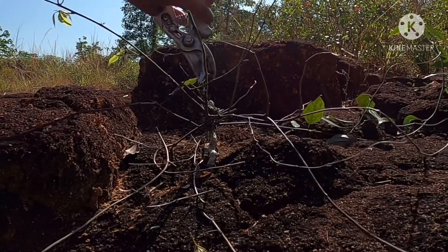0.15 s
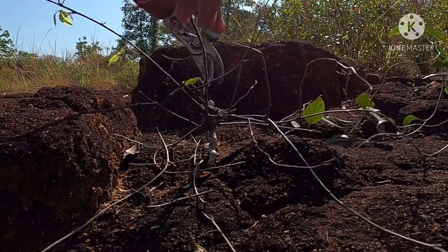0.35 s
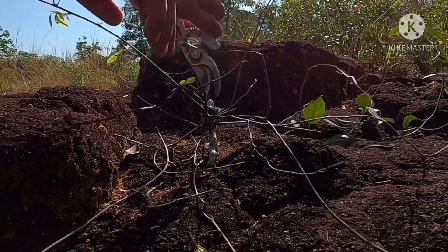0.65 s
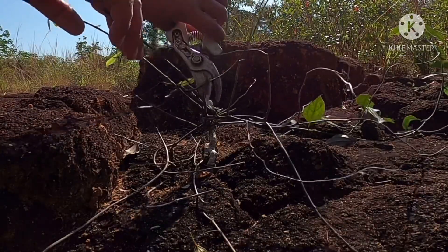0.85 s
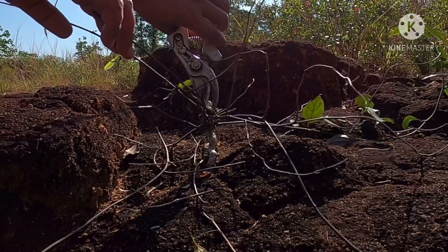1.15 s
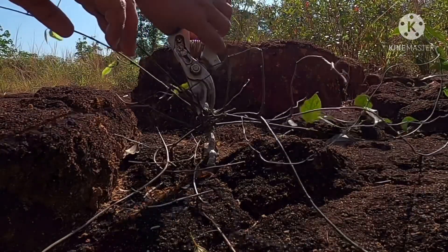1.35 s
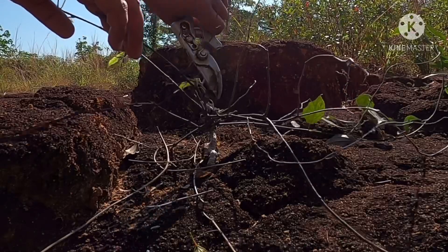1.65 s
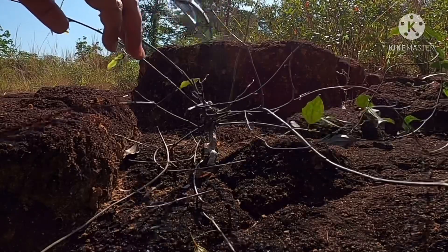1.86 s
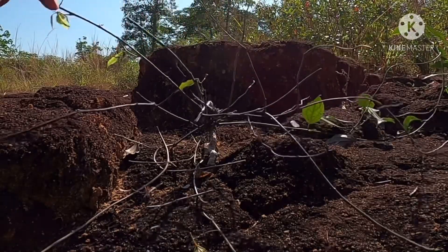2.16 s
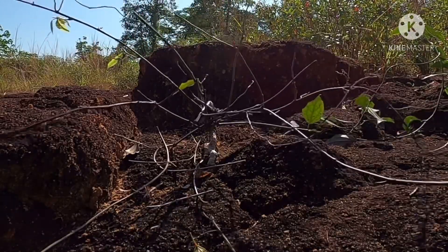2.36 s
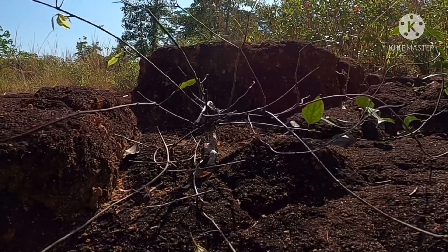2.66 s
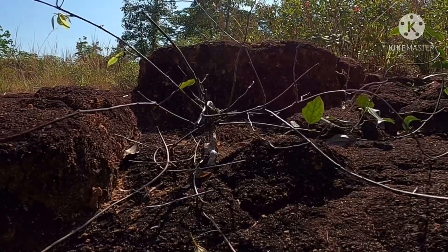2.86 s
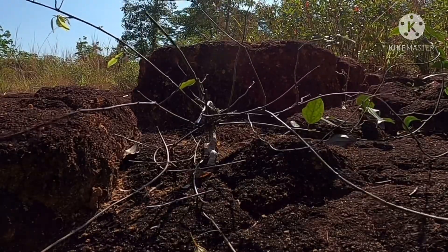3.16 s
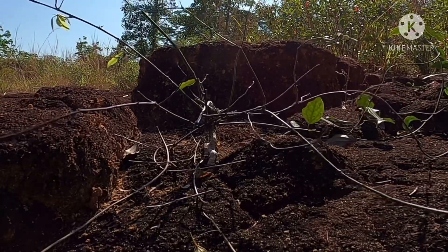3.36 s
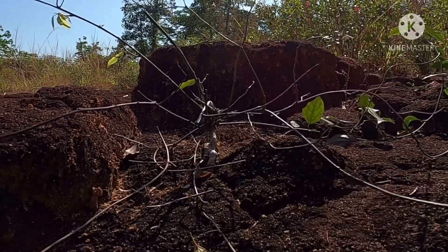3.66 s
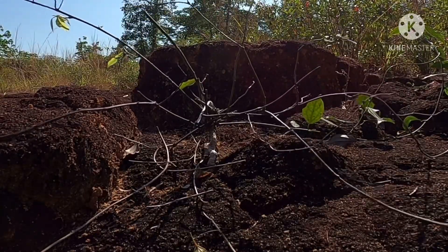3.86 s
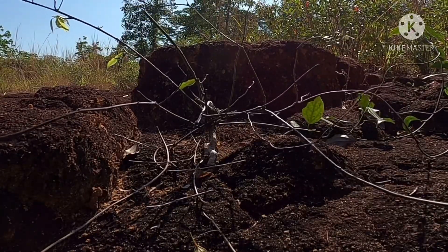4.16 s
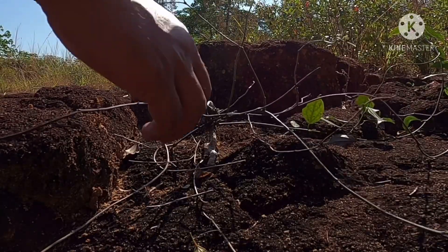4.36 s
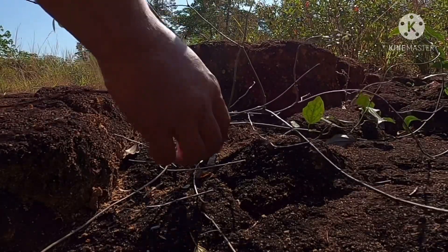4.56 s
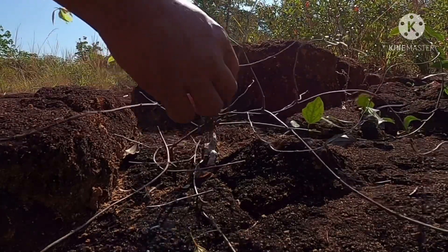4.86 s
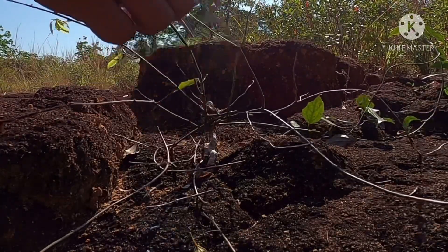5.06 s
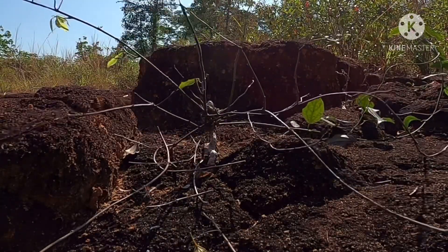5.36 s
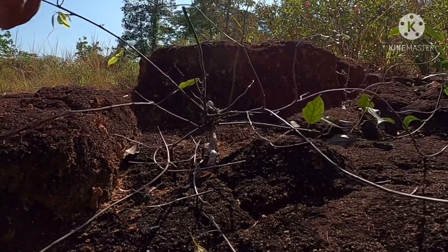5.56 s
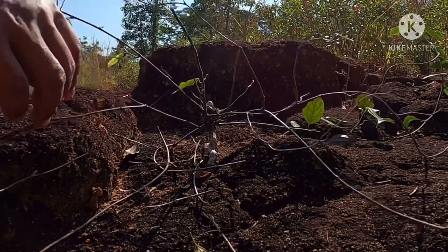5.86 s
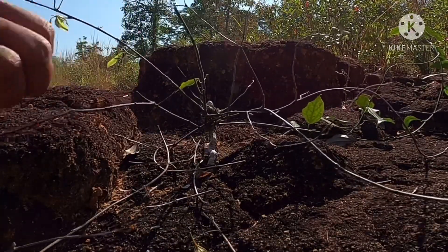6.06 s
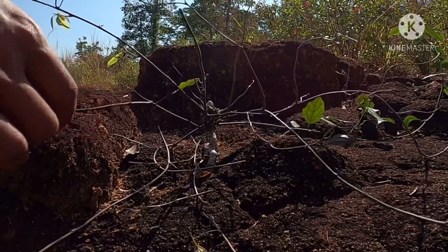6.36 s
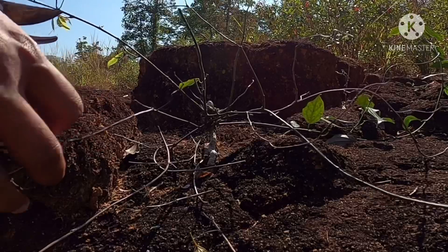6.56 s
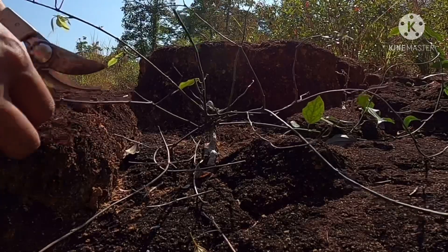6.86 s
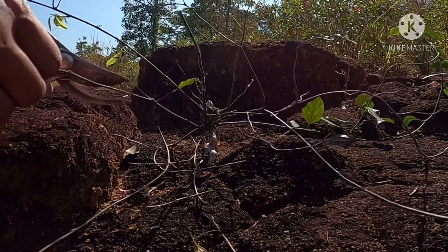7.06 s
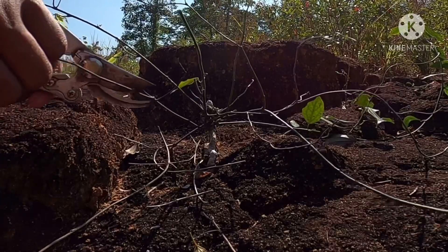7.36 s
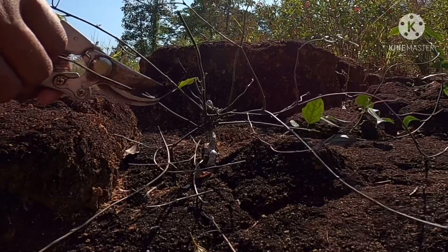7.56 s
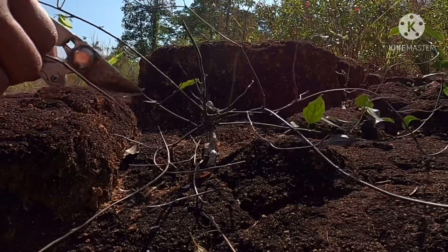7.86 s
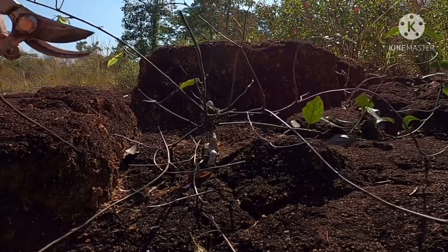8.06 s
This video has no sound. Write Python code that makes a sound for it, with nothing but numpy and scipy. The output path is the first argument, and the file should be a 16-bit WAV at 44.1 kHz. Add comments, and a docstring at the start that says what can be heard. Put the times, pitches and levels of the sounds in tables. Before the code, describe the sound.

A phone-like microphone sits close to dry twigs on stony open ground. Small ticks lead to a few thin metallic snips, then near quiet with birds whistling softly in scrub. Twigs crackle, scrape and snap as hands pull at them, a stony knock rings briefly, and finally the shears cut with a very loud, bright click. A distant single-cylinder engine murmurs low, and wind briefly bumps the microphone early on.

```python
"""Pruning dry twigs on stony ground

Shears cut thin dry twigs close to a phone: noise puffs ring steel and wood; hands drag twigs that tick and rustle.
Birds are gliding sines in the echo of the scrub: a falling whistle, a thin high trill, short chips and a peep.
A far single-cylinder engine throbs as puffs through a pipe, air hums as shaped noise, and a short gust
buffets the microphone ports with lumpy bass noise."""
import sys
import numpy as np
from scipy import signal
from scipy.fft import rfft, irfft, next_fast_len
from scipy.io import wavfile
from scipy.ndimage import uniform_filter1d, map_coordinates

SR = 44100
rng = np.random.default_rng(int(sys.argv[2]) if len(sys.argv) > 2 else 0)


def to_wav(sig):
    """Store sig (one row per channel, or 1-D mono) as 16-bit WAV at the path in sys.argv[1].

    Samples outside -1..1 are clipped; the rate is SR.
    """
    pcm = np.clip(np.atleast_2d(sig), -1, 1) * 32767
    pcm = np.round(pcm).astype(np.int16)
    wavfile.write(sys.argv[1], SR, pcm.T)  # frames by channels


N = 362502  # samples


def amp(db):
    """Gain of a level in dB."""
    return 10 ** (np.asarray(db) / 20)


def unit(x):
    """Scaled to rms 1."""
    return x / np.sqrt(np.mean(x ** 2) + 1e-20)


def peak(x):
    """Scaled to peak 1."""
    return x / np.abs(x).max()


def along(points, hz):
    """Reads a curve of (Hz, value) points on a log frequency axis."""
    f, v = np.transpose(points)
    return np.interp(np.log(hz + 1), np.log(f + 1), v)


def curves(rows):
    """One value per sample for each column after the time."""
    s, *cols = np.transpose(rows)
    return [np.interp(np.arange(N) / SR, s, c) for c in cols]


def wobble(rate):
    """A smooth random curve, rate knots a second."""
    knots = rng.standard_normal(int(N * rate / SR) + 4)
    return map_coordinates(knots, [np.arange(N) * rate / SR])


def filtered(x, response):
    """x through a complex response of frequency."""
    n = x.shape[-1]
    m = next_fast_len(n + 4096)
    return irfft(rfft(x, m) * response(np.fft.rfftfreq(m, 1 / SR)), m)[..., :n]


def modes(table, notched=False):
    """Causal response of (Hz, width Hz, dB) resonances; notched leaves dips between them."""
    def response(f):
        total = 0
        for k, (centre, width, db) in enumerate(table):
            sign = 1 if notched else (-1) ** k
            damping = 1j * f * width
            total = total + sign * amp(db) * damping / (centre * centre - f * f + damping)
        return total
    return response


def pair(alike):
    """Two white noises of a given left-right likeness."""
    a, b = rng.standard_normal((2, N))
    u = np.arccos(np.clip(alike, 0, 1)) / 2
    return np.array([np.cos(u) * a + np.sin(u) * b, np.cos(u) * a - np.sin(u) * b])


def add(out, s, sound, pan_db=0):
    """Mixes a sound in at s seconds; pan_db is left over right."""
    i = round(s * SR)
    sound = np.atleast_2d(sound)[:, max(-i, 0):N - i]
    first = max(i, 0)
    out[:, first:first + sound.shape[1]] += sound * amp([[pan_db / 2], [-pan_db / 2]])


def burst(t60, lead_s, alike, snap=6):
    """A stereo puff of noise that swells for lead_s, cracks and dies; returns it and its lead-in in seconds."""
    t = np.arange(-1024, 3072) / SR
    a, b = rng.standard_normal((2, len(t)))
    noise = np.array([a, alike * a + np.sqrt(1 - alike ** 2) * b])
    noise[0, 1025] = noise[1, 1024] = snap  # the break itself, reaching the right port first
    shape = np.where(t < 0, np.exp(t / lead_s), amp(-60 * t / t60))
    return noise * shape, -t[0]


def shears():
    """Blades scrape through the wood, then strike; the steel rings briefly and the handles thump."""
    # Each row: contact in seconds, peak in dB before pan, growth time of the scrape in seconds, t60 in seconds,
    # wood pitch in Hz, its level in dB, second pitch in Hz, its level in dB, left over right in dB,
    # treble in dB (none below 4 kHz, in full from 12 kHz)
    snips = [(1.628, -36, 0.00026, 0.04, 4460, 6, 2880, 4, -11, -15),
             (1.6385, -34, .0005, .008, 4100, 6, 1300, 6, -6, -10),
             (1.645, -19, 0.002, 0.0035, 3480, 11, 1430, 3, 4, -10),
             (1.8165, -29.5, 0.0056, 0.0033, 2800, 12, 7030, -2, -2, -4),
             (7.8361, -15.5, .00015, 0.007, 4080, 3, 8830, 9, 3.5, 2),
             (7.8614, -17, .0003, .004, 2600, 8, 2330, 0, 5, -14),
             (7.863, -29, .003, 0.022, 2500, 4, 1850, 6, 6, -14),
             (7.8637, -5, 0.0001, .003, 5500, 4, 7450, 2, -1, 6),
             (8.0035, -29.5, 0.00041, 0.01, 2750, 9, 4330, -22, 6.5, -15)]
    # Resonances of the blades. Each row: centre in Hz, width in Hz, level in dB
    steel = [(2080, 130, -4), (2610, 140, 1), (2950, 150, -4), (3460, 220, -2), (4080, 200, -3),
             (4450, 160, -2), (5540, 400, -1), (6985, 150, 1), (7560, 350, -5), (8800, 250, -11),
             (10400, 1100, -5), (13000, 500, -16)]
    # The handles close: time in seconds, level in dB, pitch in Hz, t60 in seconds
    thump = (7.8685, -32, 185, .07)
    out = np.zeros((2, N))
    for s, db, lead_s, t60, hz, wood_db, second_hz, second_db, pan_db, treble_db in snips:
        puff, early = burst(t60, lead_s, alike=1.0)
        ring = filtered(puff, modes(steel, notched=True))
        # the cut wood sounds at its own pitches
        wood = [(hz, .11 * hz, wood_db), (second_hz, .05 * second_hz, second_db)]
        crack = filtered(puff, modes(wood, notched=True))

        def small_parts(f):  # they radiate no bass
            no_bass = (1j * f / (1100 + 1j * f)) ** 3
            return no_bass * amp(treble_db * np.clip(f / 8000 - .5, 0, 1))
        thin = filtered(ring + crack, small_parts)
        add(out, s - early, amp(db) * peak(thin), pan_db)
    s, db, hz, t60 = thump
    t = np.arange(SR // 8) / SR
    add(out, s, amp(db - 60 * t / t60) * np.sin(2 * np.pi * hz * t))
    return out


def spring():
    """The loose spring of the shears buzzes for a moment around a cut: noise in its resonances."""
    # Each row: start in seconds, end in seconds, rms level in dB
    rattles = [(1.806, 1.843, -65), (7.88, 7.93, -62), (7.995, 8.02, -53)]
    # Resonances of the spring. Each row: centre in Hz, width in Hz, level in dB
    coil = [(2965, 56, 6.5), (2000, 250, -5)]
    out = np.zeros((2, N))
    for start, end, db in rattles:
        noise = rng.standard_normal(round((end - start) * SR))
        buzz = filtered(noise * signal.windows.tukey(len(noise), .6), modes(coil))
        add(out, start, amp(db) * unit(buzz))
    return out


def twigs():
    """Each snap or tick is a short puff around its own pitch, over the twig's body, with more or less treble."""
    # Each row: time in seconds, level in dB, centre in Hz, treble in dB, t60 in seconds
    ticks = [(.055, -57, 2000, -30, 0.013), (0.144, -45.5, 3270, -11.5, 0.028),
             (0.188, -52, 2340, -10, 0.022), (0.234, -45, 3040, -9, 0.013),
             (0.501, -52.5, 2300, -30, 0.018), (0.63, -62.5, 6840, -35, .03),
             (.799, -55.5, 4100, -27, 0.022), (.824, -51, 5400, -20, 0.031),
             (0.854, -47.5, 4570, -23, 0.034), (0.9657, -49, 4530, -28, 0.025),
             (1.7255, -56, 3980, 2, .012), (1.7447, -42, 4700, -2, .005), (1.7637, -50, 5600, -14, 0.031),
             (1.796, -38, 5600, -12, 0.0091), (1.94, -46, 4060, -5, 0.032),
             (2.232, -39.5, 2600, -55, 0.022), (3.4447, -44, 1400, -40, 0.016),
             (3.852, -48, 1500, -40, .015), (4.006, -32.5, 1370, -55, 0.031),
             (4.196, -36.5, 2670, -24, 0.013), (4.555, -49.5, 1560, -26, 0.016),
             (4.568, -58, 5760, -16, .015), (4.595, -53, 4020, -15, 0.015), (4.654, -46, 2300, -12, 0.038),
             (4.688, -55, 2950, -17, .02), (4.739, -50.5, 2430, -4.5, 0.014),
             (4.792, -47, 3230, -14, 0.017), (4.8043, -59, 5000, 1, .012), (4.817, -54, 6000, -8, 0.011),
             (4.876, -46.5, 2980, -9, .025), (4.9472, -31.5, 3240, -2, 0.016),
             (5.016, -36.5, 3900, -14.5, 0.017), (5.049, -52, 2500, -4, 0.0088),
             (5.111, -50, 2320, -20, 0.017), (5.147, -46, 2500, -21, 0.014), (5.203, -60, 4030, -8, .012),
             (5.4071, -28, 3440, -12.5, 0.016), (5.448, -49, 3530, -9, 0.017), (5.462, -55, 8100, -5, .012),
             (5.4849, -51, 5330, -13, .02), (5.588, -45, 5900, -16, .012), (5.5965, -37.5, 3550, -8, 0.016),
             (5.662, -58, 7000, -10, .012), (5.81, -39.5, 3770, -30, 0.014), (5.824, -51, 6500, -22, 0.015),
             (5.941, -44.5, 5600, -18, 0.016), (6.007, -47, 5000, -13, .015),
             (6.017, -43.5, 3900, -20, 0.018), (6.03, -51, 6500, -15, 0.018),
             (6.076, -29, 2220, -21.5, 0.02), (6.1062, -31.5, 2160, -21, 0.033),
             (6.1125, -32, 2860, -27, 0.031), (6.156, -46, 3960, -16, 0.016),
             (6.2145, -42, 1560, -22, 0.032), (6.278, -45, 5070, -20, 0.03), (6.304, -58, 7000, -10, 0.011),
             (6.323, -48, 6010, -19, 0.011), (6.336, -45, 5000, -14, .01), (6.346, -37, 4150, -31, 0.032),
             (6.419, -47.5, 7720, -20, .015), (6.5254, -42.5, 4320, -36, 0.022),
             (6.702, -52, 5050, -14, .015), (6.8357, -53, 4168, -28, .02), (6.969, -56, 5200, -16, 0.018),
             (7.972, -53, 6360, -29, .02)]
    break_size = 3.7  # the break over the noise of the puff
    body_db = -13.5  # low body of the twig
    out = np.zeros((2, N))
    for s, db, hz, treble_db, t60 in ticks:
        puff, early = burst(t60, lead_s=0.00005, alike=0.48, snap=break_size)
        puff /= np.sqrt(np.sum(puff ** 2) / (t60 * SR))

        def colour(f):
            pitch = modes([(hz, 1.2 * hz, 0)])(f) ** 3
            body = amp(body_db) * modes([(900, 1400, 0)])(f) ** 2
            treble = amp(treble_db) * modes([(9500, 5000, 0)])(f) ** 2
            return pitch + body + treble
        add(out, s - early, amp(db) * filtered(puff, colour), pan_db=0.5)
    return out


def knocks():
    """Dull thuds and a ringing stony knock: a crack, decaying sines and a low thud."""
    # Each row: time in seconds, level in dB, left over right in dB, freedom to ring 0-1, crack over level in dB
    hits = [(0.7582, -46.5, -4, 0.4, -25), (4.007, -42, -8, 0.07, -38), (5.397, -52, -23, 0.8, -20),
            (5.4087, -26.5, -22, 1, 7)]
    # Tones of the ring. Each row: pitch in Hz, level in dB, t60 in seconds when fully free
    tones = [(817, -6, 0.07), (841, -7, 0.059), (918, -2.5, 0.031), (1080, -15.5, 0.058),
             (1370, -15, 0.022), (381, -6, 0.027), (289.2, -14.5, 0.067)]
    # Resonance of the thud. Each row: centre in Hz, width in Hz, level in dB
    thud_body = [(391, 400, 0)]
    out = np.zeros((2, N))
    t = np.arange(SR // 6) / SR
    for s, db, pan_db, free, crack_db in hits:
        puff, early = burst(0.0053, lead_s=0.000075, alike=0.97)
        crack = peak(filtered(puff, modes([(5800, 390, -1.0), (9000, 600, -10.5)])))
        add(out, s - .0018 - early, amp(db + crack_db) * crack, -2.5)
        ring = sum(amp(level - 60 * t / (free * t60)) * np.sin(2 * np.pi * hz * t) for hz, level, t60 in tones)
        onset = 1 - np.exp(-t / (free * 0.002))
        add(out, s, amp(db) * ring * onset, pan_db)
        thud = peak(filtered(puff, lambda f: modes(thud_body)(f) ** 2))
        thud_db = 4 * (1.5 - 2 * free)  # +6 dB for a fully damped knock, -2 dB for a free one
        add(out, s - early, amp(db + thud_db) * thud)
    return out


def grit(rate, spread_db, cycles):
    """Tiny contacts, each a short damped ring of its own pitch and size, a little different at each port."""
    draw = rng.random((int(rate * N / SR), 5))
    hz = 900 * 14 ** draw[:, 1:2]
    size = amp(-spread_db * np.log(1.01 - draw[:, 2:3]))  # few are large
    t = np.arange(160) / SR
    spot = (draw[:, :1] * N).astype(int) + np.arange(len(t))
    life = size * np.exp(-t * hz / cycles) * np.sqrt(hz / 3000)
    ports = [life * np.sin(2 * np.pi * hz * t + 1.6 * draw[:, k:k + 1]) for k in (3, 4)]
    return unit(np.array([np.bincount(spot.ravel(), p.ravel())[:N] for p in ports]))


def drag():
    """Twigs and dry leaves dragged over stone: crackle and hiss in the twigs' resonance, trailing off softly."""
    # Each row: start in seconds, length in seconds, rms level in dB, centre in Hz
    strokes = [(0, 0.35, -66.5, 2540), (0.239, 0.059, -59, 3200), (0.78, 0.089, -78, 1120),
               (1.386, 0.073, -65, 3760), (1.503, 1.01, -69, 4320), (1.623, 0.031, -50, 4260),
               (1.63, 0.041, -55, 1300), (1.647, 0.031, -63, 3600), (1.717, 0.13, -64, 4520),
               (1.786, 0.019, -58, 6540), (2.125, 0.24, -71, 2760), (3.424, 0.32, -72, 1380),
               (4.013, 0.21, -62, 1700), (4.2, 0.42, -72, 1990), (4.564, 0.67, -65.5, 4340),
               (4.645, 0.12, -62.5, 2300), (4.785, 0.051, -69, 3730), (4.869, 0.11, -57.5, 3080),
               (4.969, 0.2, -64, 2100), (5.433, 0.28, -69, 4130), (5.46, 1.45, -73.5, 4200),
               (5.806, 0.035, -62.5, 2750), (5.916, 0.12, -63.5, 4720), (6.005, 0.028, -60.5, 3350),
               (6.087, 0.12, -57, 2380), (6.105, 0.13, -49.5, 1600), (6.108, 0.1, -52, 3420),
               (6.195, 0.16, -60, 3400), (6.28, 0.019, -66, 5330), (6.332, 0.057, -58.5, 3680),
               (6.384, 0.21, -71, 3350), (6.624, 0.16, -70, 4944), (6.945, 0.045, -67, 5210),
               (7.858, 0.1, -59.5, 3420), (7.977, 0.066, -59.5, 3530), (8.171, 0.045, -63.5, 5000)]
    grip_s, let_go_s = 0.003, .02  # time constants of attack and release
    fade_db = 5.5  # loss over the length of a stroke
    out = np.zeros((2, N))
    rough = grit(1500, 3.4, cycles=3.2) + 1.35 * pair(0.19)
    rough = rough * amp(1.4 * wobble(45) + 2.4 * wobble(220))
    for start, length, db, hz in strokes:
        piece = rough[:, max(round(start * SR), 0):round((start + length + .04) * SR)]
        t = np.arange(piece.shape[1]) / SR
        attack = 1 - np.exp(-t / grip_s)
        release = np.exp(-np.maximum(t - length + let_go_s, 0) / let_go_s)
        shape = attack * amp(-fade_db * t / length) * release

        def colour(f):
            no_bass = (1j * f / (650 + 1j * f)) ** 2
            return modes([(hz, 1.6 * hz, 0)])(f) ** 3 * no_bass
        add(out, start, amp(db) * unit(filtered(piece * shape, colour)), pan_db=2.0)
    return out


def echo(x, wet_db):
    """The bushes scatter each frequency back as decaying noise, differently to each port."""
    # Each row: frequency in Hz, t60 of the scrub in seconds
    scrub = [(500, 0.49), (3000, 0.5), (6000, 0.89), (8000, 0.99)]
    hz, t, z = signal.stft(rng.standard_normal((2, SR // 2)), SR, nperseg=256)
    # some bushes answer louder
    clumps_db = 1.2 * unit(uniform_filter1d(rng.standard_normal(len(t)), size=4))
    decay_db = -60 * t / along(scrub, hz)[:, None]
    tail = signal.istft(z * amp(clumps_db + decay_db), SR, nperseg=256)[1]
    return amp(wet_db) * signal.fftconvolve(x, tail / np.linalg.norm(tail[0]), axes=1)


def bird(shape, calls, wet_db, pan_db, blur=1):
    """One sine glide repeated with small changes; it flutters through the leaves and is blurred by echoes."""
    # Near rocks and soil return a call almost at once.
    # Each row: delay in seconds (before its random stretch), level in dB at blur 1
    ground = [(.0025, -5), (.0065, -6), (.012, -7)]
    out = np.zeros((2, N))
    s, hz, db = np.transpose(shape)
    t = np.arange(int(s[-1] * SR)) / SR
    edge = np.clip(np.minimum(t, s[-1] - t) / 0.0013, 0, 1)
    flutter_db = blur * (4 * wobble(160) + 2.2 * wobble(70))
    paths = [(0, -2.5)] + [(delay_s, level / blur) for delay_s, level in ground]  # direct path first
    for start, level_db, *share in calls:
        now = round(abs(start) * SR) + np.arange(len(t))  # which stretch of flutter this call gets
        pitch = np.interp(t, s, hz) * np.prod(share) * rng.normal(1, 0.00276)
        phase = 2 * np.pi * np.cumsum(pitch) / SR
        tones = np.sin([phase, phase + rng.uniform(-3.7, 3.04)])
        note = amp(level_db + np.interp(t, s, db)) * edge * tones
        for delay_s, path_db in paths:
            heard = note * amp(flutter_db[now] + path_db)
            add(out, start + delay_s * rng.uniform(0.79, 1.4), heard, pan_db)
        add(out, start + 0.0041, echo(note, wet_db))
    return out


def birds():
    """A falling whistle, a high trill, two chips and a soft two-toned peep, each a glide with its list of calls."""
    # Glides. Each row: time in seconds, pitch in Hz (before a call's share), level in dB over that of the call
    whistle, trill, chip, peep = [(0, 6050, 0.5), (.018, 5590, 5.5), (.03, 4800, 8.5), (.045, 4170, 6.5),
                                  (.065, 3730, 5), (.09, 3330, 0), (.122, 2900, -5)], [(0, 8270, 3), (.012, 8200, 5), (.035, 7870, 6),
                                                   (.062, 7510, 3)], [(0, 6680, 4), (.015, 6360, 0.5)], [(0, 2235, 5),
                                                                                (.07, 2205, 5),
                                                                                (.085, 2150, 0),
                                                                                (.1, 1950, 2),
                                                                                (.125, 1870, 1)]
    # Calls. Each row: start in seconds, level in dB
    whistles, chips = [(-.07, -68.5), (0.461, -67.5), (1.008, -66), (1.509, -63.5), (2.022, -62.5),
                       (2.576, -64), (3.109, -63), (3.645, -62.5), (4.307, -63.5), (4.846, -59.5),
                       (5.478, -65.5), (6.68, -63.5)], [(7.122, -72.5), (7.715, -72)]
    # Calls. Each row: start in seconds, level in dB, pitch as a share of the glide
    trills, peeps = [(5.04, -72.5, 1.025), (5.256, -70.5, 1), (5.447, -72.5, .995), (5.632, -72, .98),
                     (5.826, -71.5, .98), (6.018, -72, .97), (6.218, -72.5, .97), (6.428, -73, .965)], [(4.335, -75.5, 1), (4.338, -83, .89)]
    return (bird(whistle, whistles, wet_db=5.1, pan_db=7.6)
            + bird(trill, trills, wet_db=3, pan_db=2.4, blur=.5)
            + bird(chip, chips, wet_db=1.29, pan_db=0.13)
            + bird(peep, peeps, wet_db=2, pan_db=.1, blur=.5))


def engine():
    """One exhaust puff per firing, part clean push and part noise, through the pipe."""
    # Each row: time in seconds, level in dB
    levels = [(0, -47), (.6, -50.5), (1.4, -51.5), (2.2, -61), (3, -58.5), (4.3, -56), (5.3, -58.5),
              (6, -64.5), (6.8, -55.5), (7.7, -59), (8.22, -65)]
    # Resonances of the pipe. Each row: centre in Hz, width in Hz, level in dB
    pipe = [(74, 52, -6.5), (177.2, 25, 6.5), (314, 36, -20.5)]
    firings_per_s = 16.3  # mean rate
    uneven = .1  # slow drift of the rate as a share
    db, = curves(levels)
    rate = firings_per_s * (1 + uneven * wobble(1.2) + 0.0296 * wobble(5.4))
    turn = np.cumsum(rate) / SR % 1  # 0-1 from one firing to the next
    gate = turn * np.exp(-turn / 0.22)
    push = np.exp(-turn / 0.067)
    rush = gate * filtered(pair(.9), lambda f: f < 600)
    puff = (rush + .06 * push) * amp(1.2 * wobble(15))
    piped = filtered(puff, modes(pipe))
    return amp(db) * unit(filtered(piped, modes([(163, 440, 0)])))


def wind():
    """Turbulence at the ports: lumpy bass, different on each side; each eddy swells fast and ebbs slower."""
    # Eddies at the ports, and last a jolt of the cutting.
    # Each row: time in seconds, peak level in dB before the tilt to the left
    eddies = [(.94, -38.5), (1.041, -37), (1.17, -49.5), (1.32, -43), (1.553, -34), (1.69, -38.5),
              (7.87, -61)]
    # Spectrum. Each row: frequency in Hz, relative density in dB per Hz
    spectrum = [(8.8, -48), (18, -4.5), (38, 3), (62, -2.5), (120, -13.5), (200, -18), (260, -41),
                (440, -120)]
    calm_db, swell_db_per_s, ebb_db_per_s = -75.5, 321, 173  # level between eddies; how fast one comes and goes
    t = np.arange(N) / SR
    gain = amp(calm_db)
    for s, db in eddies:
        gain = gain + amp(db + np.minimum(swell_db_per_s * (t - s), ebb_db_per_s * (s - t)))
    lumps = amp(1.4 * np.array([wobble(11.0), wobble(47)]))
    rumble = filtered(pair(0.51), lambda f: amp(along(spectrum, f)))
    return gain * amp([[3.5], [.5]]) * unit(lumps * rumble)


def air():
    """Far hum and hiss of the open country: noise alike at both ports only in the bass."""
    # Spectrum. Each row: frequency in Hz, relative density in dB per Hz
    spectrum = [(15, -47), (25, -31), (70, -3), (175, -1.5), (344, -10.5), (840, -27), (1040, -20.5),
                (2480, -27), (4870, -26.5), (6560, -34.5), (8140, -34.5), (9320, -43.5), (12200, -48.5),
                (13600, -45), (16000, -74)]
    # Each row: frequency in Hz, left-right likeness
    likeness = [(60, 1), (130, 0.92), (290, 0.82), (640, 0.43), (1400, 0.43), (3000, 0.12), (7000, 0.0042)]
    z = signal.stft(rng.standard_normal((2, N)), nperseg=512)[2]
    # the level drifts a little over time and frequency
    field = uniform_filter1d(rng.standard_normal(z.shape[1:]), 6, 0)
    field = uniform_filter1d(field, 14, 1)
    noise = signal.istft(z * amp(1.3 * unit(field)), nperseg=512)[1][:, :N]

    def mid_side(f):
        turn = np.arccos(np.clip(along(likeness, f), -1, 1)) / 2
        return amp(along(spectrum, f)) * [np.cos(turn), np.sin(turn)]
    mid, side = filtered(noise, mid_side)
    return amp(-57) * unit(np.array([mid + side, mid - side]))


def scene():
    """Near hands and shears, knocks, birds, engine, wind and air."""
    near = shears() + spring() + twigs() + knocks() + drag()
    return near + birds() + engine() + wind() + air()


def record(dry):
    """The phone loses treble and keeps nothing above its band limit."""
    # Each row: frequency in Hz, gain in dB
    mic = [(20, 0.5), (11000, -1.5), (13500, -8), (16400, -21)]
    top_hz = 16400
    return filtered(dry, lambda hz: amp(along(mic, hz)) * (hz < top_hz))


dry = scene()
out = record(dry)
to_wav(out)
```